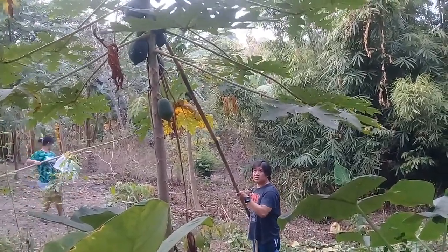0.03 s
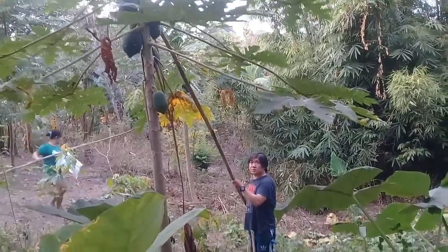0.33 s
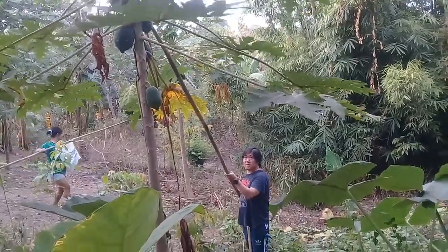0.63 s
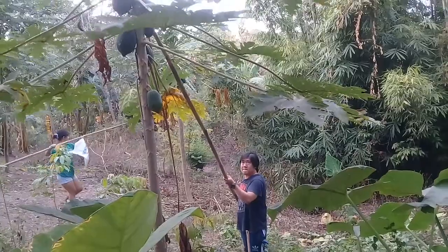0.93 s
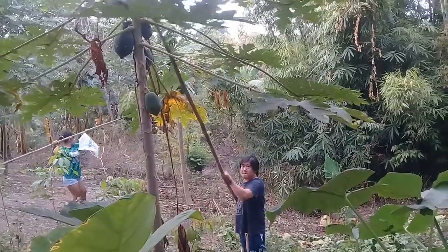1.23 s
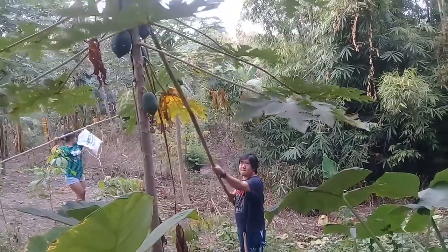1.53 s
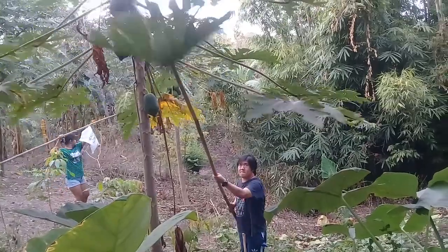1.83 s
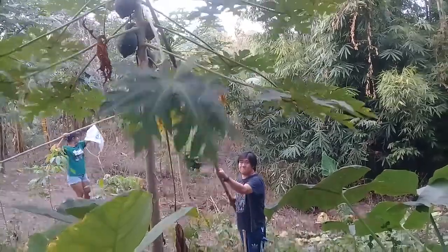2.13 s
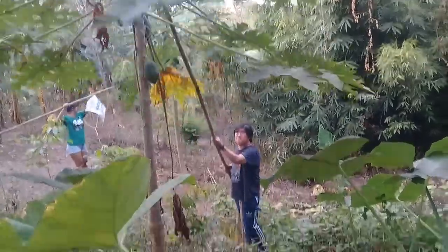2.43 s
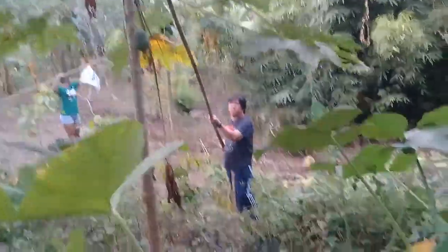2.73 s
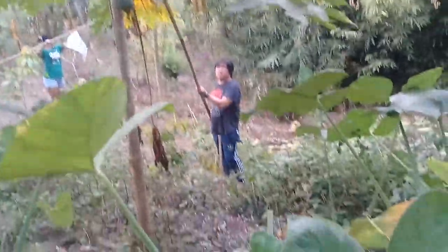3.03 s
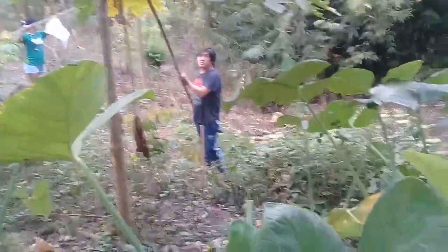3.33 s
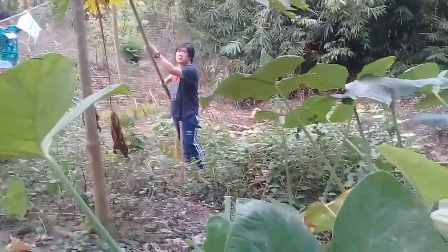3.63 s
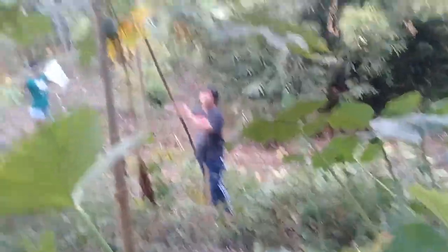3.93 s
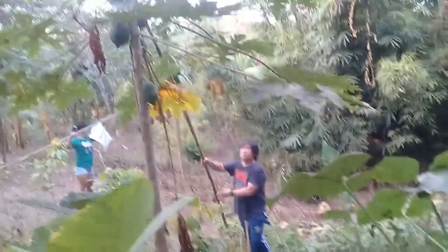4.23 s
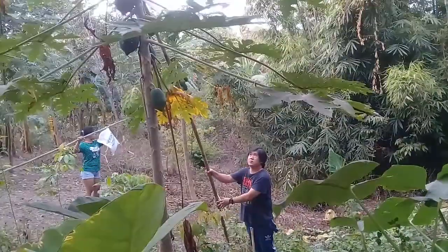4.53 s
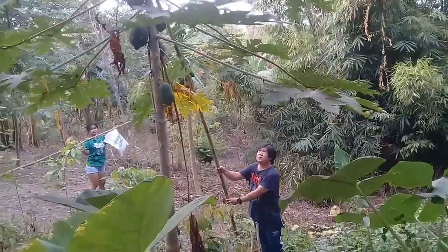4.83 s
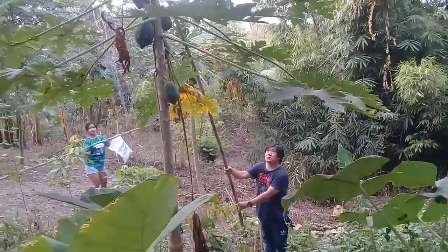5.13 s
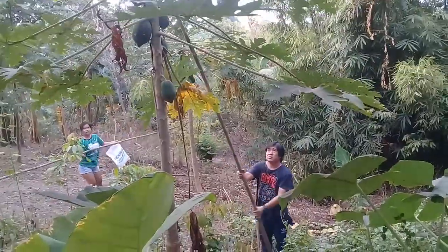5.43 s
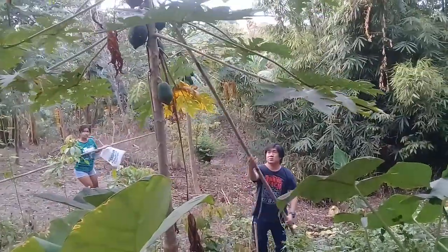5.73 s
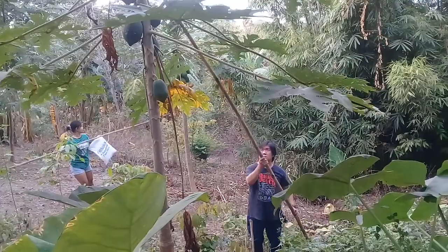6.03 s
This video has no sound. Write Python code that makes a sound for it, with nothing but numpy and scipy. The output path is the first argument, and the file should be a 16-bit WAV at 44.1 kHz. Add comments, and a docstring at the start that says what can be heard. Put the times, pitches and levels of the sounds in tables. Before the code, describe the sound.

A quiet farm has a low air rumble, thin high insect hiss and a faint distant motor hum throughout. At about 0.4 seconds a finger taps and brushes the microphone with a sharp, close click. A few metres away, papaya leaves stir. At 1.2 seconds a bamboo pole scrapes along a stalk, followed until 1.6 by a loud cluster of snaps and hollow clacks. Leaves swish strongly near 1.9. At 2.3 a stalk cracks and a big leaf thuds onto dry litter, with crunching, a knock and crackly rustling until about 3. The pole knocks sharply at 3.1, then several more times, more lightly, from 3.7 to 4, with soft ground thumps. After that it is quieter: light rustling, a small snap at 4.8, a faint scrape, and two tiny bamboo squeaks near 6 seconds.

```python
"""On a farm, a few metres away, a long bamboo pole is poked up into the crown of a papaya tree.
Impacts and stick-slip friction excite the modes of pole and stalks: the pole clacks, grinds and squeaks,
and stalks snap. Leaves rustle in countless small collisions, and a big leaf thuds onto dry litter.
Near the start a finger taps and brushes the microphone's case. Behind it all the air rumbles,
insects hiss and a far motor hums."""
import sys
import numpy as np
from scipy import signal
from scipy.fft import rfft, irfft, next_fast_len
from scipy.io import wavfile

SR = 44100
rng = np.random.default_rng(int(sys.argv[2]) if len(sys.argv) > 2 else 0)


def int16_out(signal):
    """Quantize to a 16-bit WAV file."""
    q = np.round(np.clip(np.atleast_2d(signal).T, -1, 1) * 32767)
    wavfile.write(sys.argv[1], SR, q.astype(np.int16))


N = 267598
TIME = np.arange(N) / SR

# Spectra of the noise sources. Each row: frequency in Hz, relative spectral density in dB.
AIR_SPECTRUM = [(15, -41.5), (25, -25.5), (85, -5), (120, 0), (149, -12), (363, -24), (451, -34),
                (1330, -40.5), (1700, -38.5), (2840, -40), (5140, -48), (6740, -53), (9570, -54.5),
                (11000, -34.5), (12200, -56), (16000, -62)]
INSECT_SPECTRUM = [(9000, -44.5), (10000, -4.5), (10500, 7.5), (10800, 0.5), (11300, 7), (11700, -37),
                   (12800, -35.5)]
SWISH_SPECTRUM = [(200, -12.5), (400, -5.5), (650, -15), (900, -5.5), (1250, -6.5), (1800, -6),
                  (2300, -0.5), (2900, 0), (3350, -2), (4200, -4), (5200, -6), (6500, -18), (8000, -21.5),
                  (16000, -45.5)]
CRACKLE_SPECTRUM = [(500, -18.5), (1500, -10), (4000, -2.5), (7500, 1), (10000, 4.5), (13000, 7),
                    (16000, -4.5)]
CRUNCH_SPECTRUM = [(100, -2), (200, -1.5), (400, 2), (650, -9), (1000, -6.5), (2000, -7.5), (3500, -14),
                   (7000, -33), (16000, -41.5)]
# Loudness of the insect chorus. Each row: time in seconds, level in dB.
INSECT_LEVELS = [(0, -89), (.6, -67), (2.5, -62), (3.8, -73), (5.0, -64), (5.5, -70), (6.07, -67)]
# A hand bumps the case. Each row: start in seconds, level in dB, frequency in Hz, quality factor.
CASE_TAPS = [(.398, -31.5, 96, 8.2), (.4245, -32, 200, 2.3), (.4345, -23.5, 128, 1.3),
             (.4425, -18, 112, 2.7), (.457, -32, 89, 10), (.4785, -22.5, 167, 1.9)]
# Sharp clicks on the case. Each row: time in seconds, level in dB, pulse width in seconds.
CASE_CLICKS = [(0.4238, -33, 0.00015), (0.4428, -24, 0.00012), (0.4559, -3, 0.00007),
               (0.4781, -20, 0.000086)]
# Skin brushes the case. Each row: start, rise time and 60 dB decay time in seconds, level in dB.
CASE_BRUSHES = [(.415, 0.018, 0.32, -55), (0.447, 0.016, 0.071, -42), (.47, .045, 0.66, -62)]
# A bough is shaken. Each row: start, rise time and 60 dB decay time in seconds, swish level in dB,
# crackle in dB relative to the swish.
BOUGH_SHAKES = [(.44, 0.19, 2.9, -65, -2.5), (.72, 0.048, 0.9, -55, -8.5), (.95, 0.27, 1.5, -68, -24.5),
                (1.26, 0.12, 0.62, -38.5, -10.5), (1.38, 0.097, 3.1, -45, -13.5),
                (1.841, 0.086, 0.41, -33.5, -9), (1.97, 0.043, 0.15, -49, 1.5), (2.21, .07, .5, -49.5, 1),
                (2.368, 0.023, 0.13, -36.5, -4.5), (2.42, 0.036, 1.7, -45, -2.5),
                (2.56, 0.043, 0.73, -44, -3.5), (2.7, 0.19, 4.2, -54.5, -0.5), (2.94, 0.048, 1.3, -45, -4),
                (3.251, 0.38, 1.5, -49.5, -23), (3.74, 0.065, 2.7, -55.5, -23),
                (4.08, 0.1, 0.98, -52, -1.5), (4.45, 0.2, 0.49, -60.5, -9), (4.93, 0.13, 3.3, -61.5, -10),
                (5.479, 0.31, 2.4, -54.5, -20.5), (5.79, 0.07, 1.4, -52.5, -10.5)]

# Stalks and dry leaves snap, and at 1.219 s and 1.24 s the pole bites into a stalk as it starts to slide; # the
# pole knocks on stalks and trunk. Each row: start in seconds, length in seconds, base level in dB, # spectral
# tilt in dB per octave, bite in dB.
STALK_SNAPS = [(.595, 0.0035, -62.5, 11.5, -20), (.736, 0.0076, -46, -6, 9.5), (1.219, .007, -60.5, -6, 14),
               (1.24, 0.031, -54.5, -6, 16), (1.341, 0.0077, -25, -3, -14),
               (1.3595, 0.004, -24.5, -2.5, 13.5), (1.497, 0.019, -24, -3, -8.5),
               (1.852, 0.023, -39.5, -7.5, -5), (1.869, 0.003, -51.5, 2, 19), (1.968, .004, -29.5, .5, -22),
               (2.236, 0.0034, -51.5, 1.5, 3.5), (2.263, 0.011, -56.5, 3, 10), (2.289, 0.0067, -35, 0, 2),
               (2.296, .005, -24.5, 0.5, -2.5), (2.3625, 0.0054, -39, -7.5, 7),
               (2.651, 0.035, -45.5, 1, 0.5), (3.002, 0.016, -36.5, -3.5, -11),
               (4.8135, 0.0045, -39.5, 3.5, 0.5), (4.832, 0.025, -49.5, 2.5, 5)]
POLE_KNOCKS = [(1.379, 0.014, -21, 1.5, -12), (1.41, .011, -30, -1, 1.5), (1.456, 0.0035, -37.5, -5.5, 4.5),
               (1.479, 0.0064, -33.5, -2, 8), (1.5065, 0.0098, -17.5, 0, 7), (1.521, 0.0077, -27, 8.5, -4),
               (1.542, 0.0065, -20, 1.5, 0.5), (1.589, .013, -27, -1, 3), (1.747, 0.0087, -41, -7, 9),
               (1.817, 0.0077, -47, -1, 2), (2.425, 0.022, -32, 0, -5), (2.436, 0.008, -29, 5, 3),
               (3.107, 0.0058, -19, 2.5, -.5), (3.123, 0.0023, -22.5, 3.5, -7.5),
               (3.158, 0.01, -31, -1, 2.5), (3.354, 0.0081, -39, -2, 4.5),
               (3.7355, 0.012, -29.5, -1.5, -1.5), (3.765, 0.015, -33, -2, -4.5),
               (3.785, 0.045, -37, -2.5, -7), (3.86, 0.038, -42, -2.5, -7.5),
               (3.991, 0.018, -45.5, -0.5, -22)]
# The tilt turns about the pivot; bite, the hard edge of splitting fibres, is a broad spectral peak.
PIVOT_HZ, BITE_HZ = 2500, 4320
# The four bands of a snap or knock. Each row: lower edge in Hz, upper edge in Hz.
CRACK_BANDS = [(720, 1580), (1780, 3560), (3700, 6100), (6000, 14200)]
# Mean spectra of a snap and a knock. Each entry: one band's offset from the base level in dB.
SNAP_BAND_DB = [-14, -2, -2, -1.5]
KNOCK_BAND_DB = [-7, -0.5, -8, -15.5]
# Modes of a hollow stalk, of the sliding contact and of the hollow pole.
# Each row: frequency in Hz, bandwidth in Hz, gain in dB.
STALK_RESONANCES = [(2820, 490, -5), (3350, 200, 5), (4380, 580, 5.5), (11570, 2800, 0.5)]
SLIDE_RESONANCES = [(960, 77, -3.5), (2100, 68, 2.5), (2860, 180, -3), (3340, 200, -9.5), (4530, 170, 3),
                    (5570, 230, -22.5)]
POLE_RESONANCES = [(854, 47, 13), (1080, 78, 10), (1567, 32, 5), (2070, 60, 0), (2260, 63, -8),
                   (2685, 54, -1), (2694, 55, -11.5), (3448, 70, -9.5), (3950, 80, -5.5), (4670, 230, 2),
                   (4990, 50, -13.5), (5560, 23, -11)]
# The pole slides along a stalk. Each row: start in seconds, length in seconds, final level in dB.
POLE_SLIDES = [(1.227, 0.11, -34.5), (3.472, 0.43, -73), (4.55, .07, -75), (5.645, 0.17, -71)]
# Short low crunches: crushed litter and, at 4.81 s, the low tail of a stalk's snap.
# Each row: start in seconds, length in seconds, level in dB.
LOW_CRUNCHES = [(1.85, 0.025, -44), (1.9, 0.045, -77), (2.35, 0.07, -47), (2.431, 0.077, -51),
                (2.547, 0.095, -47), (2.65, 0.059, -54), (2.968, 0.045, -44.5), (3.041, 0.017, -48.5),
                (3.34, 0.014, -44), (4.81, 0.024, -53.5)]
# Thuds on the ground. Each row: start in seconds, level in dB, frequency in Hz, quality factor.
GROUND_THUDS = [(2.2975, -16, 172, 0.61), (2.317, -30.5, 120, 3.8), (3.140, -31.5, 76, 0.72),
                (3.353, -36, 246, 3.9), (3.860, -34, 160, 2.3), (3.908, -39, 166, 2),
                (3.922, -37, 188, 2.3), (3.994, -36.5, 196, 1.3), (4.577, -39.5, 252, 2.3)]
# The bamboo squeaks. Each row: start in seconds, frequency in Hz, level in dB.
BAMBOO_SQUEAKS = [(5.951, 1680, -44), (5.986, 1610, -45.5)]
# The highest treble from the tree. Each row: time in seconds, gain in dB.
TREBLE_GAINS = [(0, 3), (2.4, 1.5), (3.1, 0), (3.2, -7.5), (4.85, -8), (5.3, -2.5)]


def from_db(db):
    """Amplitude grows tenfold for every 20 dB."""
    return 10 ** (np.asarray(db) / 20)


def rms_one(x):
    """Division by the root mean square gives unit power."""
    return x / np.sqrt(np.mean(x ** 2) + 1e-20)


def gain_curve(rows):
    """Linear interpolation in dB gives an amplitude that moves exponentially between points."""
    times, db = np.transpose(rows)
    return from_db(np.interp(TIME, times, db))


def add(out, start_s, sound):
    """Superposition: a sound adds to what is already there."""
    start = max(0, int(start_s * SR))
    out[start:start + len(sound)] += sound[:N - start]


def drift(rate_hz):
    """Interpolated random values form a smooth fluctuation of unit power."""
    knots = rng.standard_normal(int(N / SR * rate_hz) + 3)
    return rms_one(np.interp(TIME * rate_hz, np.arange(len(knots)), knots))


def colour(x, spectrum):
    """Filtering multiplies spectra; the result has unit power."""
    hz, db = np.transpose(spectrum)
    size = next_fast_len(N)
    bin_hz = np.maximum(np.fft.rfftfreq(size, 1 / SR), 1)
    gain = from_db(np.interp(np.log(bin_hz), np.log(hz), db))
    return rms_one(irfft(rfft(x, size) * gain, size)[:N])


def band(x, edges_hz, kind="band", order=2):
    """A Butterworth filter has a maximally flat passband."""
    return signal.sosfilt(signal.butter(order, edges_hz, kind, fs=SR, output="sos"), x)


def resonance(x, hz, width_hz):
    """A damped oscillator responds most at its natural frequency, here with unit gain."""
    return signal.lfilter(*signal.iirpeak(hz, max(hz / width_hz, .3), fs=SR), x + 1e-18)


def grains(per_s, spread_db, size):
    """Shot noise: independent impulses of uneven strength."""
    strength = from_db(spread_db * np.minimum(rng.exponential(1, size), 4))
    return (rng.random(size) < per_s / SR) * strength * rng.choice([-1, 1], size)


def swell(start_s, rise_s, t60, db):
    """A damped motion is driven smoothly up to a level, then decays exponentially."""
    t = np.maximum(TIME - start_s, 0)
    rise = np.sin(np.pi / 2 * np.minimum(t / rise_s, 1)) ** 2
    return rise * from_db(db - 60 * np.maximum(t - rise_s, 0) / t60)


def air():
    """Outdoor noise with its power at low frequencies is heard as a rumble."""
    return from_db(-51.5) * colour(rng.standard_normal(N), AIR_SPECTRUM)


def motor():
    """Slight frequency and amplitude modulation make a far motor's hum waver."""
    hz = 122.5 + 0.81 * drift(4.5)
    amplitude = from_db(-56.5 + 1.2 * drift(3))
    return amplitude * np.sin(2 * np.pi * np.cumsum(hz) / SR)


def insects():
    """Many incoherent callers sum to a narrow band of noise."""
    return gain_curve(INSECT_LEVELS) * colour(rng.standard_normal(N), INSECT_SPECTRUM)


def bumps(rows, corner_hz):
    """A soft contact, with little force above its corner frequency, sets a damped body swinging."""
    out, t = np.zeros(N), TIME[:SR // 8]
    force = t ** 2 * np.exp(-2 * np.pi * corner_hz * t)
    for start_s, db, hz, quality in rows:
        swing = resonance(force, hz, hz / quality)
        add(out, start_s, from_db(db) * swing / np.abs(swing).max())
    return band(out, 34, "high")


def finger_on_case():
    """Structure-borne sound: bumps, skin friction, and clicks of a narrow pull and a wider push."""
    clicks, t = np.zeros(N), TIME[:SR // 50] - .01
    hard_edge = from_db(-21) * np.exp(-.5 * (t / 16e-6) ** 2)
    for time_s, db, width_s in CASE_CLICKS:
        pull = np.exp(-.5 * (t / width_s) ** 2)
        push = 0.97 * np.exp(-.5 * ((t / width_s - 6) / 2.76) ** 2)
        add(clicks, time_s + t[0], from_db(db) * (push - pull - hard_edge))
    friction = rms_one(band(grains(3000, 3.5, N), (300, 2800), order=3))
    brushes = sum(swell(*row) for row in CASE_BRUSHES) * friction
    return band(clicks, 115, "high", order=1) + brushes + bumps(CASE_TAPS, corner_hz=667)


def rustle(per_s, spread_db, diffuse):
    """Scattering in the foliage blurs part of a stream of tiny clicks into hiss."""
    return rms_one(grains(per_s, spread_db, N)) + diffuse * rng.standard_normal(N)


def foliage():
    """Shaken leaves swish and their dry edges crackle; incoherent shakes add in power."""
    swish_power, crackle_power = from_db(-86.5) ** 2, from_db(-87) ** 2  # leaves at rest
    for start_s, rise_s, t60, db, crackle_db in BOUGH_SHAKES:
        motion = swell(start_s, rise_s, t60, db)
        swish_power += motion ** 2
        crackle_power += (motion * from_db(crackle_db)) ** 2
    swish = colour(rustle(per_s=3000, spread_db=3.5, diffuse=0.88), SWISH_SPECTRUM)
    crackle = colour(rustle(per_s=3900, spread_db=-1.5, diffuse=1.4), CRACKLE_SPECTRUM)
    flutter = from_db(.9 * drift(70))
    return flutter * (np.sqrt(swish_power) * swish + np.sqrt(crackle_power) * crackle)


def cracks(rows, modes, band_db, per_s, spread_db, sag_nepers, release_s, echo_db, wash_db, t60, flex_db):
    """Modal excitation: a volley of fibre slips rings a body; nearby stems scatter a decaying wash."""
    out, t = np.zeros(N), TIME[:SR * 2 // 3]
    octaves = np.log2(np.sqrt(np.prod(CRACK_BANDS, axis=1)) / PIVOT_HZ)
    bite_shape = np.exp(-(octaves - np.log2(BITE_HZ / PIVOT_HZ)) ** 2)
    for start_s, length_s, base_db, tilt, bite_db in rows:
        levels = base_db + np.array(band_db) + tilt * octaves + bite_db * bite_shape
        progress = np.minimum(t / length_s, 1)
        force = np.exp(-np.maximum(t - length_s, 0) / release_s - sag_nepers * progress)
        echo = from_db(echo_db) * np.interp(t - .016, t, force, left=0)  # from the nearest trees
        energy = np.sum(force ** 2) / SR  # a longer contact feeds the wash more
        wash = from_db(wash_db - 60 * t / t60) * np.sqrt(energy / t60) * progress
        slips = force * rms_one(grains(per_s, spread_db, len(t)))
        slips += np.hypot(echo, wash) * rng.standard_normal(len(t))
        # The point of contact decides how strongly each mode answers.
        ringing = sum(from_db(db + rng.normal(0, 2.8)) * resonance(slips, hz, width_hz)
                      for hz, width_hz, db in modes)
        for edges_hz, db in zip(CRACK_BANDS, levels):
            part = band(slips + ringing, edges_hz, order=4)
            contact_rms = np.sqrt(np.mean(part[:int(length_s * SR) + 1] ** 2))
            add(out, start_s, from_db(db) * part / contact_rms)
        # The slender body also bends, which radiates only weakly.
        add(out, start_s, from_db(levels[0] + flex_db) * band(slips, (220, 700)))
    return out


def stalk_snaps():
    """Fracture excites the broad, heavily damped modes of a hollow leaf stalk."""
    return cracks(STALK_SNAPS, STALK_RESONANCES, SNAP_BAND_DB, per_s=6000, spread_db=0.5,
                  sag_nepers=0.71, release_s=0.0031, echo_db=-14, wash_db=7.5, t60=0.45, flex_db=6.5)


def pole_slides(grip_s=.008, build_db=22, t60=.12):
    """Stick-slip friction on a stalk drives resonances, harder as pressure builds, then lets go."""
    pressure = np.zeros(N)
    for start_s, length_s, db in POLE_SLIDES:
        t = np.maximum(TIME - start_s, 0)
        below_peak_db = build_db * np.maximum(1 - t / length_s, 0)
        decay_db = 60 * np.maximum(t - length_s, 0) / t60
        pressure += np.minimum(t / grip_s, 1) * from_db(db - below_peak_db - decay_db)
    slips = grains(5000, 2.2, N)
    ringing = sum(from_db(db) * resonance(slips, hz, width_hz) for hz, width_hz, db in SLIDE_RESONANCES)
    return pressure * rms_one(band(ringing, (700, 6000)))


def pole_knocks():
    """Impact excites the narrow, lightly damped modes of the hollow bamboo."""
    return cracks(POLE_KNOCKS, POLE_RESONANCES, KNOCK_BAND_DB, per_s=6400, spread_db=1.5,
                  sag_nepers=.25, release_s=.004, echo_db=-16, wash_db=3.5, t60=0.39, flex_db=2.5)


def low_crunches():
    """Short bursts of dull shot noise form the crush of dry litter and the low tail of one snap."""
    envelope = np.zeros(N)
    for start_s, length_s, db in LOW_CRUNCHES:
        corners_s = [0, .004, 0.0057 + length_s, 0.054 + length_s]
        burst = np.interp(TIME[:SR // 2], corners_s, [0.84, 0.92, 0.99, 0.1])
        add(envelope, start_s, from_db(db) * burst)
    return envelope * colour(rustle(per_s=790, spread_db=1.0, diffuse=0.39), CRUNCH_SPECTRUM)


def ground_thuds():
    """A slow, soft impact on the ground excites only low frequencies."""
    return bumps(GROUND_THUDS, corner_hz=290)


def squeaks():
    """Frictional oscillation: slipping bamboo chirps for a moment on an unsteady pitch."""
    out, envelope = np.zeros(N), np.hanning(int(0.013 * SR))
    for start_s, hz, db in BAMBOO_SQUEAKS:
        pitch = hz * (1 + 0.022 * drift(330)[:len(envelope)])
        add(out, start_s, from_db(db) * envelope * np.sin(2 * np.pi * np.cumsum(pitch) / SR))
    return out


def early_reflections(x, count=10):
    """Interference with faint reflections from trunks and ground ripples the spectrum."""
    out, dull = x.copy(), band(x, 5000, "low")
    for delay_s in rng.uniform(.002, .028, count):
        add(out, delay_s, from_db(-19) * rng.choice([-1, 1]) * dull)
    return out


def treble_shelf(x, corner_hz=11000):
    """A time-varying shelf filter leaves the highest treble open at first, then duller for a while."""
    high = signal.sosfiltfilt(signal.butter(4, corner_hz, "high", fs=SR, output="sos"), x)
    return x + (gain_curve(TREBLE_GAINS) - 1) * high


def scene():
    """Sounds of the tree, the ground, the case and the background superpose in one channel."""
    tree = pole_knocks() + stalk_snaps() + pole_slides() + squeaks() + foliage()
    tree = from_db(-0.64) * treble_shelf(early_reflections(tree))
    foreground = tree + low_crunches() + ground_thuds() + finger_on_case()
    return (foreground + air() + motor() + insects())[None]


def record(dry):
    """An elliptic low-pass filter cuts steeply above 16.1 kHz."""
    return signal.sosfilt(signal.ellip(10, .1, 70, 16100, fs=SR, output="sos"), dry)


dry = scene()
out = record(dry)
int16_out(out)
```